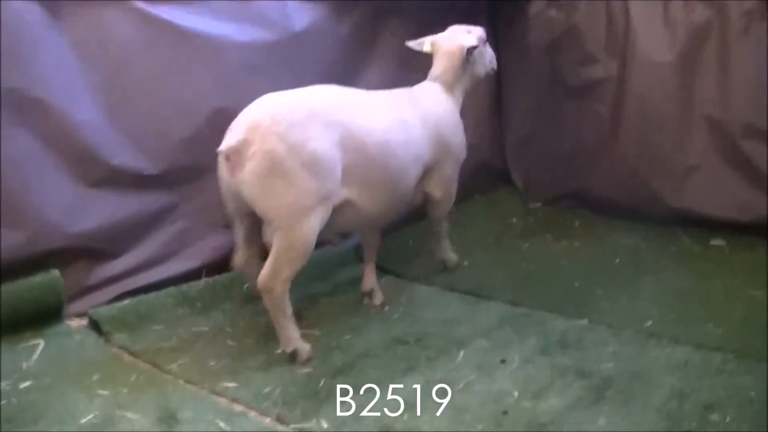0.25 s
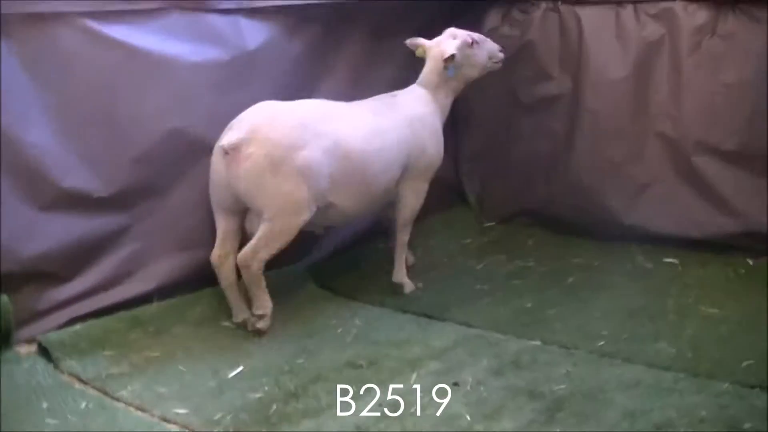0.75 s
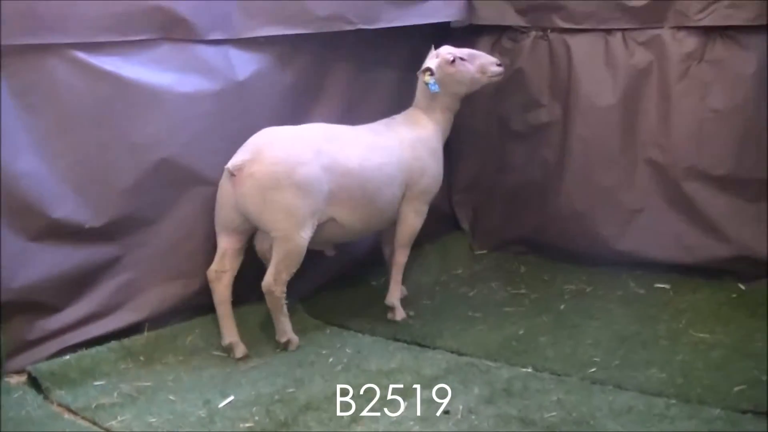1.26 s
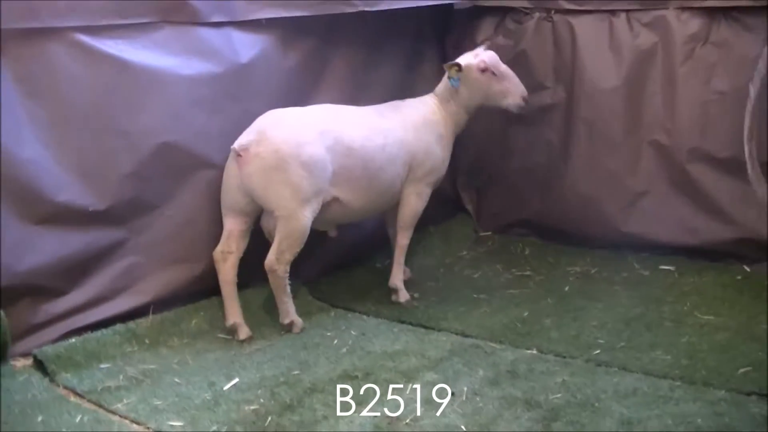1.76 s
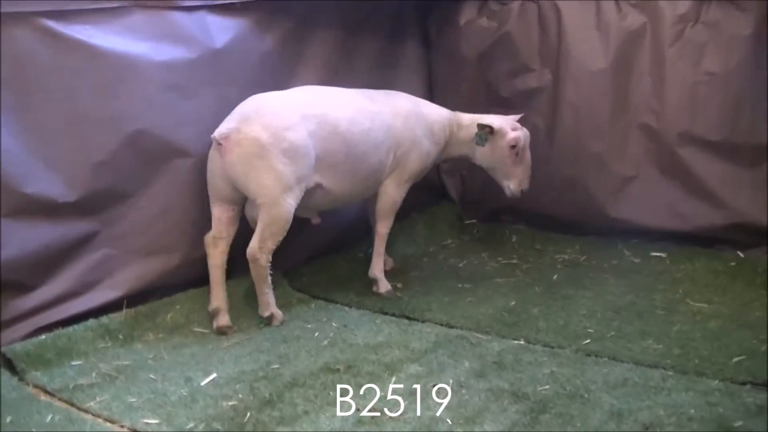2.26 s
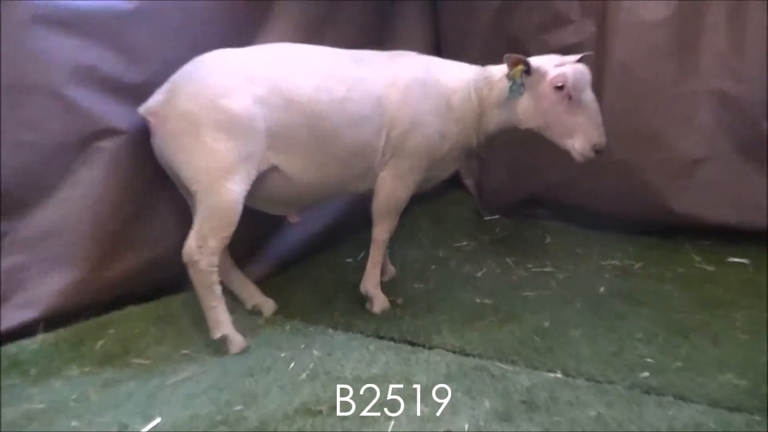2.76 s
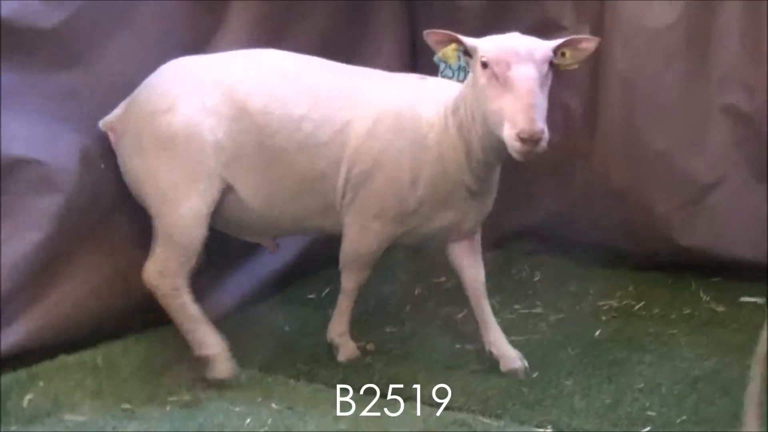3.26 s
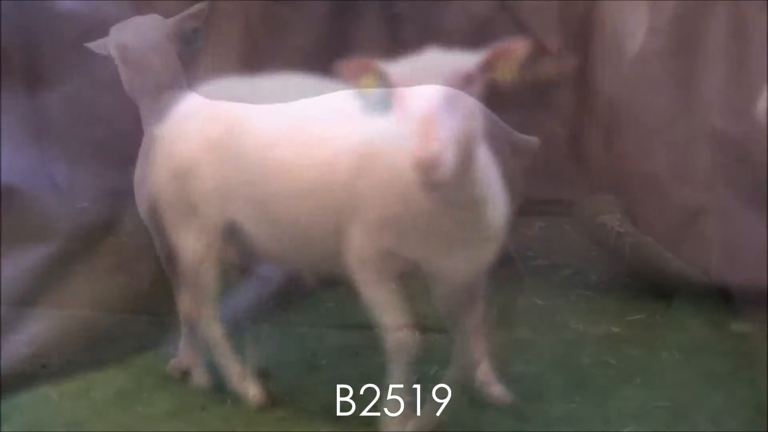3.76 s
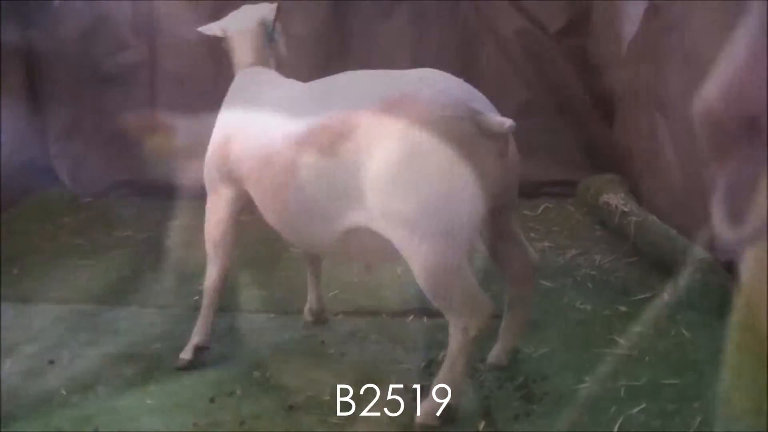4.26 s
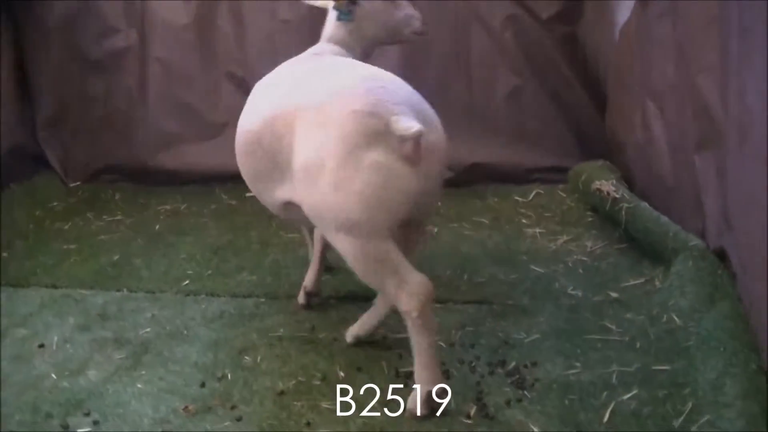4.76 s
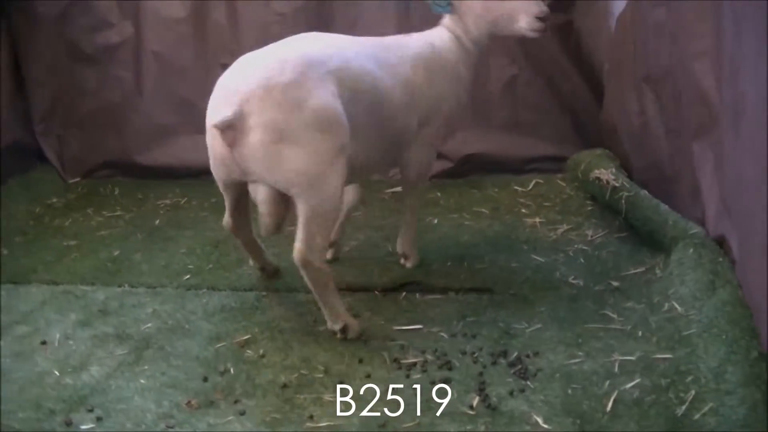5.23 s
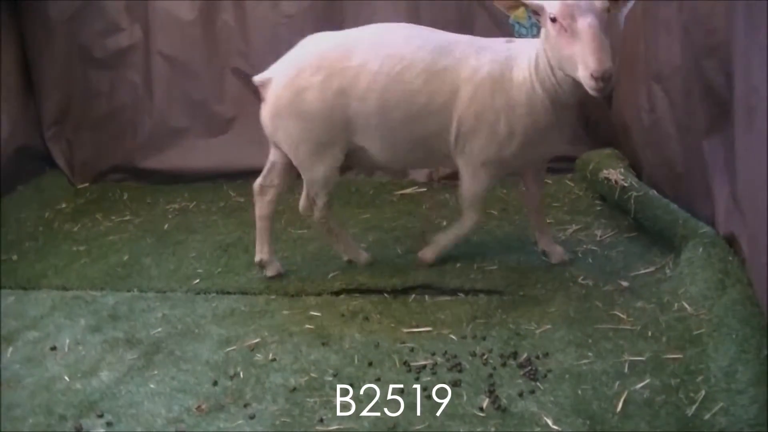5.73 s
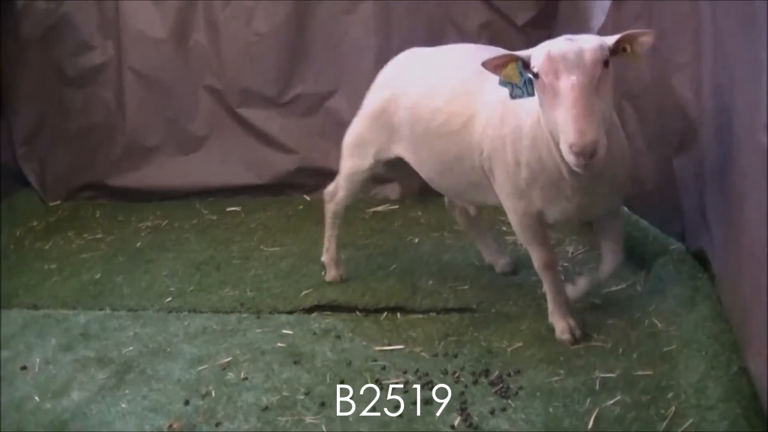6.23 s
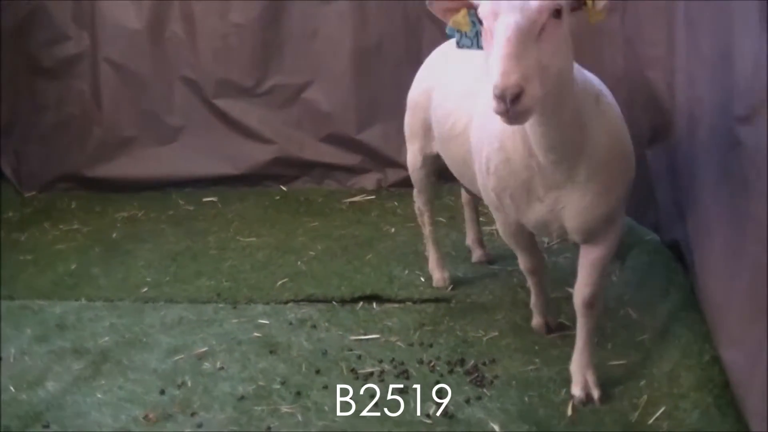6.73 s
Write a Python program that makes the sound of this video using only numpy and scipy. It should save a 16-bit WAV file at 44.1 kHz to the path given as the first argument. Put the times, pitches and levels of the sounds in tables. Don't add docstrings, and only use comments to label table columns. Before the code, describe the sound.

A ram hums low then opens into a rough bleat, a higher lamb answers hoarsely, and small birds chirp and whistle throughout an echoing shed.

```python
import sys
import numpy as np
from scipy import signal
from scipy.io import wavfile
from scipy.ndimage import uniform_filter1d

SR = 44100
rng = np.random.default_rng(int(sys.argv[2]) if len(sys.argv) > 2 else 0)


def boost(x):
    u = np.asarray(x, float) / 20
    return 10 ** u


def transcribe(u):
    v = np.clip(np.atleast_2d(u).T, -1, 1)
    q = np.round(v * 32767).astype(np.int16)
    wavfile.write(sys.argv[1], SR, q)


N = 308241
CLEAR = .008

# frequency in Hz, level in dB.
HISS_COLOUR = [(150, -43), (250, -2.5), (386, 3), (685, -5.5), (1740, -8.5), (5570, -4), (7030, -6),
               (10200, -3)]
# frequency in Hz, correlation from -1 to 1.
LIKENESS = [(60, 0.33), (300, 0), (1100, 0.22), (2400, 0.77), (5000, 1), (10000, 0.99)]
# frequency in Hz, level in dB per Hz.
AIR_COLOUR = [(15, -17), (22, -0.5), (50, -4), (290, -24.5), (447, -54.5), (600, -75.5)]
# peak time in seconds, rise over the calm in dB.
GUSTS = [(.1, 3), (.45, 6), (.8, 7), (1.6, -3), (2.942, 3.5), (4.56, 11), (4.8, 4), (5.12, 14),
         (5.47, 14.5), (5.85, 6.5), (6.22, 8), (6.64, 7.5)]
OFFSET = [
    [.0068],
    [.0116],
]

# start in seconds, level in dB.
ARCH_SYLLABLE = ([(0, 6100, -34.5), (.01, 8000, -45.5), (.04, 8250, -46.5), (.078, 7900, -44),
                  (.107, 7100, -41)], [(.355, -6), (.597, -7.5), (.848, -4.5)])
DROP_SYLLABLE = ([(0, 5700, -42), (.013, 4250, -49), (.033, 3850, -53)], [(.487, -0.67), (.738, -1.4),
                  (.988, -1.6)])
FALL_SYLLABLE = ([(0, 6610, -39), (.015, 7400, -57.5), (.067, 6560, -45), (.115, 4410, -50)],
                  [(3.245, -0.61), (3.4, -0.74), (3.558, 1), (3.72, 0.27), (3.89, -0.38)])
LOW_ARCH_SYLLABLE = ([(0, 1674, -47.5), (.022, 1908, -40), (.036, 1813, -47), (.055, 1396, -54)],
                      [(.035, 0), (.49, 0)])

# share of the length, share of the way from first to second pitch, level in dB.
HELD = [(0, 0.018, 0.5), (1, 1, 0.5)]
DYING = [(0, 0.037, 1), (1, 0.94, -19.5)]
SWELLING = [(0, 0.054, -8), (1, 1, -3.5)]
ARCHED = [(0, 0, 0), (.45, 0.97, -3.5), (1, -.1, -2)]
HOOKED = [(0, -.1, -14), (.17, 0.99, 0.5), (.5, .7, 1), (.75, .1, -5.5), (1, 0, -10.5)]
SWOOPING = [(0, 0, -6), (.3, .65, -4), (1, 1, -3)]
SCOOPED = [(0, .5, -4), (.12, 0.011, -3), (.28, 0.069, -1.5), (.75, .85, -4), (1, 1, -4.5)]

# start in seconds, length in seconds, first pitch in Hz, second pitch in Hz, level in dB.
LEFT_HELD = [(0.276, 0.27, 1483, 1471, -66), (3.875, 0.061, 3980, 3850, -53),
             (4.036, 0.014, 4290, 2990, -48), (4.038, 0.038, 4110, 4070, -50),
             (4.358, 0.033, 5310, 5330, -41), (5.786, 0.025, 3650, 4030, -36.5),
             (5.896, 0.028, 3220, 3936, -33.5), (4.674, 0.017, 3010, 3075, -38.5),
             (4.748, 0.024, 2970, 3050, -48), (4.821, 0.013, 3720, 3280, -44),
             (4.837, 0.18, 3090, 3213, -48.5), (5.743, 0.041, 2410, 2635, -49),
             (5.976, 0.046, 3635, 2806, -44.5), (6.145, 0.019, 3920, 3450, -43.5),
             (6.188, 0.031, 3924, 3684, -46), (5.191, 0.21, 4870, 4870, -56),
             (5.422, 0.041, 2426, 2270, -57.5), (6.936, 0.057, 6180, 6220, -53)]
LEFT_DYING = [(4.102, 0.019, 3830, 3840, -36), (4.179, 0.0078, 3340, 3860, -32),
              (4.26, 0.029, 5200, 5280, -39.5), (4.279, 0.023, 3886, 4030, -29),
              (4.717, .02, 2630, 2920, -38), (4.769, 0.015, 3040, 3075, -39.5),
              (5.28, 0.032, 6890, 6910, -34), (4.69, 0.025, 2880, 2320, -41),
              (4.76, 0.014, 3300, 3690, -34), (5.555, 0.016, 5540, 2980, -41),
              (6.328, 0.01, 4870, 4350, -43.5), (5.835, 0.027, 3000, 2990, -40.5)]
LEFT_SWELLING = [(3.4, 0.077, 5540, 5170, -50), (4.167, 0.055, 4600, 4450, -38.5),
                 (4.359, 0.036, 4120, 4400, -40.5), (5.42, .035, 6540, 5850, -34.5),
                 (5.82, 0.016, 4110, 2950, -35.5)]
LEFT_ARCHED = [(5.737, 0.038, 3785, 4720, -30), (6.054, 0.043, 3403, 4360, -31.5)]
LEFT_HOOKED = [(2.408, .09, 4400, 6900, -42), (5.545, .135, 3950, 6970, -35.5)]
LEFT_SWOOPING = [(4.56, 0.04, 7600, 4700, -37), (4.595, .03, 4900, 3600, -38),
                 (4.635, .05, 5300, 2950, -34.5), (5.918, 0.0586, 3300, 2800, -38.5),
                 (5.768, 0.0223, 3900, 3700, -28)]
LEFT_SCOOPED = [(6.882, .1, 2198, 3184, -36.5)]
AHEAD_HELD = [(.164, 0.052, 1867, 3515, -46.5), (.208, 0.02, 3234, 3320, -40),
              (0.215, 0.1, 5880, 5970, -51), (4.229, 0.013, 3900, 4500, -36.5),
              (0.701, 0.028, 3100, 3130, -50), (.998, .03, 2046, 2070, -61), (1.11, 0.11, 6180, 6280, -46),
              (1.461, 0.16, 7400, 7260, -46.5), (4.41, 0.024, 5990, 6080, -43.5),
              (1.725, 0.064, 5200, 4825, -46), (1.79, 0.038, 4830, 3290, -50.5),
              (1.985, 0.023, 4980, 3700, -52), (5.575, 0.019, 2300, 2460, -58),
              (5.68, .04, 3960, 4060, -53), (1.916, 0.065, 5120, 4830, -44),
              (2.109, 0.065, 5000, 4937, -42.5), (2.266, 0.097, 7880, 7640, -45),
              (4.066, 0.14, 7840, 7480, -51), (4.101, 0.066, 5500, 5000, -55),
              (4.92, 0.028, 2486, 3594, -48.5), (5.113, 0.053, 2310, 2735, -52),
              (5.174, .12, 3190, 2860, -53.5), (5.196, 0.035, 7650, 7400, -36.5),
              (5.301, 0.078, 2553, 2280, -57), (5.94, 0.083, 2370, 2354, -55.5),
              (6.07, 0.033, 2296, 2260, -54.5)]
AHEAD_DYING = [(1.2, 0.05, 6380, 5380, -42.5), (4.24, 0.062, 4430, 4320, -30),
               (5.383, 0.079, 2738, 2820, -48), (5.717, 0.014, 5010, 3150, -40)]
AHEAD_SWELLING = [(4.428, 0.026, 6090, 4750, -36.5), (4.83, 0.029, 6600, 7300, -46.5),
                  (4.853, .018, 7150, 4160, -39.5), (5.16, 0.032, 8660, 7770, -34.5),
                  (5.322, 0.022, 5060, 7550, -37), (5.845, 0.07, 3760, 3820, -45)]
AHEAD_ARCHED = [(3.1, 0.085, 6770, 7680, -47), (5.458, 0.0337, 6070, 5590, -42)]
AHEAD_SWOOPING = [(5.36, .05, 6800, 5870, -31.5)]
RIGHT_HELD = [(.085, 0.016, 3250, 2710, -51.5), (.617, 0.061, 2157, 3555, -44),
              (1.031, 0.065, 2930, 2620, -52.5), (1.246, 0.036, 5370, 5370, -47),
              (1.245, 0.041, 4600, 4440, -49.5), (1.279, 0.0088, 4330, 3900, -47),
              (1.401, 0.03, 3274, 2594, -46.5), (1.442, 0.025, 2890, 2600, -50),
              (1.02, 0.021, 1970, 2830, -64), (5.1, 0.015, 4300, 5800, -53.5),
              (5.115, 0.02, 5830, 6000, -46), (6.69, 0.2, 3500, 3527, -48)]
RIGHT_DYING = [(0.033, 0.013, 3270, 2900, -43.5), (1.723, 0.044, 3185, 3330, -39)]
RIGHT_SWELLING = [(5.132, .035, 5930, 4480, -36.5)]
RIGHT_ARCHED = [(6.235, .07, 2490, 2855, -52)]
RIGHT_SWOOPING = [(1.516, .107, 3350, 2760, -46)]
RIGHT_SCOOPED = [(6.565, .125, 2462, 3516, -41.5)]
HARSH = [(5.24, .05, 8600, 8200, -48.5), (5.4, .06, 7000, 6700, -47), (4.03, .06, 3500, 3100, -54),
         (4.5, .05, 3500, 2700, -55.5), (.25, .1, 3500, 3480, -57), (5.135, .025, 6000, 8500, -45.5),
         (5.23, .05, 8000, 7600, -44), (5.335, 0.035, 6800, 6600, -41.5), (5.35, 0.12, 7700, 7300, -49.5),
         (1.32, .025, 4900, 3900, -45), (4.3, 0.0965, 4200, 4100, -52.5), (4.45, .07, 5000, 4800, -53.5),
         (.23, 0.065, 3100, 3100, -53), (.68, .05, 2700, 2900, -59)]

# time in seconds, pitch in Hz, level in dB.
EWE = [
    [(4.79, 275, -60), (4.846, 281.5, -58), (4.934, 289.3, -56.5), (5.14, 261.5, -57)],
    [(5.6, 280.3, -60), (5.712, 291.4, -56.5), (5.82, 281.3, -60), (5.94, 242.4, -69)],
]
# frequency in Hz, width in Hz, level in dB.
EWE_THROAT = [(1205, 100, -3.5), (1450, 280, -6), (1783, 260, -8)]

# time in seconds, pitch in Hz, level in dB, hoarseness from 0 to 1.
LAMB = [
    (2.54, 335.8, -45.5, .8),
    (2.6, 368.4, -36.5, .8),
    (2.685, 389, -34.5, .9),
    (2.73, 420.6, -37.5, 0),
    (2.82, 426, -32.5, .05),
    (2.92, 417.2, -33, 0),
    (2.96, 404, -35, 0.8),
    (3.08, 394.8, -35, 0.3),
    (3.27, 354.8, -33, 0.74),
]
# frequency in Hz, width in Hz, level in dB.
LAMB_THROAT = [(407, 200, -16), (834, 134, 2), (1212, 300, 6.5), (2620, 413, -1), (4255, 750, -4),
               (5200, 2200, -10.5), (6540, 3000, -23.5), (10020, 620, -8.5)]
# time in seconds, length in seconds, dip in dB.
CATCHES = [(2.65, 0.018, 5), (2.715, 0.026, 2), (2.9, .012, 2.5), (2.932, 0.013, 4.5), (2.965, 0.013, 1),
           (3.0, 0.013, 2), (3.115, 0.03, 8), (3.172, 0.025, 9.5), (3.222, 0.017, 2.5), (3.274, 0.023, 15),
           (2.59, .014, 4)]

# time in seconds, pitch in Hz, level in dB, mouth opening from 0 to 1.
RAM = [
    (1.1, 86.5, -59, 0.13),
    (1.3, 97.5, -47.5, 0.05),
    (1.585, 105.4, -44, 0.04),
    (1.632, 99.6, -41, 0.19),
    (1.89, 120, -37, 0.31),
    (1.985, 123, -37.5, 0.32),
    (2.015, 124.6, -29.5, 0.93),
    (2.385, 129.5, -28.5, 0.93),
    (2.46, 112, -47.5, 0.81),
]
# closed frequency in Hz, open frequency in Hz, width in Hz, closed level in dB, open level in dB.
RAM_THROAT = [(441, 376, 79, 6, 1), (195, 700, 450, 1, -13), (890, 1180, 190, -2, -4.5),
              (1536, 1570, 103, -17, -8), (2118, 1900, 200, -12.5, -16), (1780, 2044, 200, -57, -6.5),
              (2750, 3060, 640, -30.5, -9), (4600, 4800, 950, -45, -28.5)]
# mouth opening from 0 to 1, level in dB.
TWANG = [(0, -2.5), (.25, 17), (.45, 11), (1, -16)]


def rms_one(x):
    return x / np.sqrt(np.mean(x ** 2) + 1e-20)


def sampled(rows):
    s, *columns = np.transpose(rows)
    at = np.arange(round(s[0] * SR), min(round(s[-1] * SR), N))
    return at, [np.interp(at / SR, s, c) for c in columns]


def at_hz(points, hz):
    points = np.array(points)
    return np.interp(np.log(hz), np.log(points[:, 0]), points[:, 1])


def drift(rate_hz, size=N):
    r = np.exp(-2 * np.pi * rate_hz / SR)
    settle = 9000
    noise = rng.standard_normal(size + settle)
    return rms_one(signal.lfilter([1], [1, -2 * r, r * r], noise)[settle:])


def fades(size, rise_s, fall_s):
    t = np.arange(size) / SR
    return np.clip(np.minimum(t / rise_s, t[::-1] / fall_s), 0, 1)


def placed(x, pan_db, lag):
    left = np.interp(np.arange(N) - lag, np.arange(N), x)
    return np.array([left * boost(pan_db / 2), x * boost(-pan_db / 2)])


def shed(x, t60_s):
    t = np.arange(SR // 2) / SR
    near, roof = rng.standard_normal((2, 2, len(t)))
    roof = signal.sosfilt(signal.butter(1, 7000, fs=SR, output="sos"), roof)
    tail = roof * boost(-60 * t / t60_s) + near * boost(5.5 - 60 * t / 0.17)
    tail = tail * np.clip(t / 0.0029, 0, 1)
    return signal.fftconvolve(x, tail / np.sqrt(np.sum(tail ** 2) / 2), axes=1)[:, :N]


def banded_noise(spectrum, low_hz, count, patchy_db):
    out, together = 0, drift(3)
    edges = low_hz * 2 ** (np.arange(count) / 2)
    white = rng.standard_normal((2, 2, N))
    for k, (low, high) in enumerate(zip(edges, edges[1:])):
        band = signal.butter(2, [low, high], "band", fs=SR, output="sos")
        mid, side = signal.sosfilt(band, white[k % 2])
        hz = low * 2 ** .2
        alike = np.clip(at_hz(LIKENESS, hz), -1, 1)
        gain = boost(at_hz(spectrum, hz) + patchy_db * (0.46 * together + drift(24)))
        out = out + gain * (np.sqrt(1 + alike) * mid + np.sqrt(1 - alike) * side * [[1], [-1]])
    return rms_one(out)


def hiss():
    level_db, falls_db_per_s = -52, 0.79
    noise = banded_noise(HISS_COLOUR, low_hz=195, count=13, patchy_db=.4)
    return boost(level_db - falls_db_per_s * np.arange(N) / SR) * noise


def air():
    calm_db, rise_s, fall_s = -53.5, 0.2, 0.23
    t = np.arange(N) / SR
    puffs = [db * np.interp(t, [s - rise_s, s, s + fall_s], [0, 1, 0]) for s, db in GUSTS]
    return boost(calm_db + sum(puffs)) * banded_noise(AIR_COLOUR, low_hz=13.8, count=12, patchy_db=3.5)


def whistles(notes, waver_hz=35, flutter_db=1.5):
    out, waver, flutter = np.zeros(N), drift(343), drift(140)
    for rows in notes:
        at, (pitch, level_db) = sampled(rows)
        pitch = uniform_filter1d(pitch, size=330, mode="nearest") + waver_hz * waver[at]
        tone = np.sqrt(2) * np.sin(2 * np.pi * np.cumsum(pitch) / SR)
        out[at] += boost(level_db + flutter_db * flutter[at]) * fades(len(at), .003, .003) * tone
    return out


def sung(kind, notes):
    when, way, db = np.transpose(kind)
    return [np.transpose([s + length * when, first + (second - first) * way, level + db])
            for s, length, first, second, level in notes]


def repeated(shape, singings):
    return [np.array(shape) + [s, 0, db] for s, db in singings]


def flock(count):
    when, pitch, size = rng.random((count, 3)).T
    s = np.interp(when, [0, 1], (4.0, 6.65))
    hz = np.interp(pitch, [0, 1], (5770, 7400))
    notes = np.transpose([s, 0.0198 + .04 * size, hz, .85 * hz, -65 + 6 * size])
    return whistles(sung(HELD, notes))


def trill():
    note, pips_hz = (.77, .16, 2650, 2150, -58), 80
    return whistles(sung(HELD, [note])) * (1 + np.cos(2 * np.pi * pips_hz * np.arange(N) / SR))


def buzz():
    start_s, end_s = 5.378, 5.47
    hz, width_hz, level_db = 3940, 790, -45.5
    t = np.arange(N) / SR
    pulses = np.cos(np.pi * 95 * t) ** 4
    gate = pulses * np.clip(np.minimum(t - start_s, end_s - t) / 0.012, 0, 1)
    sos = signal.butter(2, [hz - width_hz / 2, hz + width_hz / 2], "band", fs=SR, output="sos")
    return boost(level_db) * gate * rms_one(signal.sosfilt(sos, rng.standard_normal(N)))


def birds():
    left = sung(HELD, LEFT_HELD) + sung(DYING, LEFT_DYING) + sung(SWELLING, LEFT_SWELLING)
    left += sung(ARCHED, LEFT_ARCHED) + sung(HOOKED, LEFT_HOOKED)
    left += sung(SWOOPING, LEFT_SWOOPING) + sung(SCOOPED, LEFT_SCOOPED)
    ahead = sung(HELD, AHEAD_HELD) + sung(DYING, AHEAD_DYING) + sung(SWELLING, AHEAD_SWELLING)
    ahead += sung(ARCHED, AHEAD_ARCHED) + sung(SWOOPING, AHEAD_SWOOPING)
    ahead += repeated(*ARCH_SYLLABLE) + repeated(*DROP_SYLLABLE) + repeated(*FALL_SYLLABLE)
    right = sung(HELD, RIGHT_HELD) + sung(DYING, RIGHT_DYING) + sung(SWELLING, RIGHT_SWELLING)
    right += sung(ARCHED, RIGHT_ARCHED) + sung(SWOOPING, RIGHT_SWOOPING) + sung(SCOOPED, RIGHT_SCOOPED)
    right += repeated(*LOW_ARCH_SYLLABLE)
    harsh = whistles(sung(HELD, HARSH), waver_hz=230, flutter_db=3.5)
    from_left = placed(whistles(left), pan_db=1.5, lag=2.82)
    from_ahead = placed(whistles(ahead) + harsh + trill() + buzz(), pan_db=-1, lag=0.6)
    from_right = placed(whistles(right), pan_db=-3.5, lag=0.85)
    return from_left + from_ahead + from_right


def voice(at, pitch, level_db, rough, throat, count, jitter, steep):
    turns = np.cumsum(pitch * (1 + jitter * (1 + 20 * rough) * drift(40, size=len(at)))) / SR
    sound, power = 0, 1e-20
    slow, slow_pitch = at[::50], pitch[::50]
    throat = [(np.broadcast_to(hz, pitch.shape)[::50], width, db) for hz, width, db in throat]
    for k in range(1, count + 1):
        detune = [(db, 2 * (k * slow_pitch - hz) / width) for hz, width, db in throat]
        paths = np.array([boost(db) / (1 + 1j * x) ** steep for db, x in detune])
        gain = np.sqrt(np.sum(abs(paths) ** 2, axis=0)) * np.exp(1j * np.angle(paths.sum(axis=0)))
        gain = np.interp(at, slow, gain.real) + 1j * np.interp(at, slow, gain.imag)
        noise_share = rough ** (1 / (1 + k * pitch[0] / 3000))
        fold_noise = drift(.4 * pitch.mean(), size=len(at))
        shimmer = np.sqrt(1 - noise_share) + np.sqrt(noise_share) * fold_noise
        shimmer *= boost(min(.5 * k, 2.5) * drift(13, size=len(at)))
        wave = np.exp(2j * np.pi * (k * turns + 0.43 * rng.random()))
        sound = sound + shimmer * np.real(gain * wave)
        power = power + abs(gain) ** 2 / 2
    out = np.zeros(N)
    out[at] = boost(level_db) * fades(len(at), 0.011, 0.0024) * sound / np.sqrt(power)
    return out


def roughness(pitch, share):
    slide = uniform_filter1d(np.gradient(np.log(pitch)) * SR, size=1000)
    return np.clip(CLEAR + share * .16 * slide ** 2, 0, .35)


def ewe():
    calls = [sampled(rows) for rows in EWE]
    return sum(voice(at, hz, db, 0.218, EWE_THROAT, count=8, jitter=0.00338, steep=2.7)
               for at, (hz, db) in calls)


def lamb():
    quaver_share, quaver_db = .011, 1.5
    bright_db, dulls_db_per_s = 3, 8.5
    at, (pitch, level_db, hoarse) = sampled(LAMB)
    quaver, t = drift(32, size=len(at)), at / SR
    upper_db = bright_db - dulls_db_per_s * (t - t[0])
    level_db = level_db - sum(db * np.exp(-(2 * (t - s) / length) ** 2) for s, length, db in CATCHES)
    throat = [(hz * (pitch / 415) ** (.5 * (hz < 8e3)), width, db + upper_db[::50] * (hz > 2e3))
              for hz, width, db in LAMB_THROAT]
    throat.append((1750, 1000, -6.5 - 25 * (1 - hoarse[::50])))
    pitch = pitch * (1 + quaver_share * (.5 + hoarse) * quaver)
    rough = np.clip(CLEAR / 4 + 0.036 * hoarse, 0, 1)
    return voice(at, pitch, level_db + quaver_db * quaver, rough, throat, count=27, jitter=0.0022, steep=2.26)


def ram():
    jaw_drop_s, tight_db_per_octave = (2.0, 2.17), 19
    at, (pitch, level_db, opening) = sampled(RAM)
    opening, jaw = opening[::50], np.interp(at / SR, jaw_drop_s, [0, 1])
    tight_db = tight_db_per_octave * opening ** 3 * (1 - jaw[::50])
    twang_db = np.interp(opening, *np.transpose(TWANG))
    throat = []
    for closed_hz, open_hz, width, closed_db, open_db in RAM_THROAT:
        db = closed_db + opening * (open_db - closed_db)
        db = db + twang_db * (2e3 < closed_hz < 4e3)
        ceiling_hz = 1900 if open_hz > 2100 else 2100
        octaves = np.log2(np.clip(open_hz, 1200, ceiling_hz) / 1500)
        db = db + tight_db * octaves * (open_hz > 1e3)
        throat.append((closed_hz + jaw * (open_hz - closed_hz), width, db))
    return voice(at, pitch, level_db, roughness(pitch, 0.6), throat, count=43, jitter=0.001, steep=1.43)


def scene():
    sheep = placed(ram(), pan_db=3.5, lag=-0.26) + placed(lamb(), pan_db=-10.5, lag=0.91) * boost(-1.5)
    far = placed(ewe(), pan_db=9.0, lag=-14.5)
    song = birds()
    stirred = np.arange(N) + 2.97 * drift(24.8)
    smeared = np.array([np.interp(stirred, np.arange(N), side) for side in song])
    roof_echoes = shed(boost(-1.0) * smeared + flock(count=140) + boost(-3.5) * far, t60_s=0.76)
    pen_echoes = boost(-10.0) * shed(sheep, t60_s=0.12)
    stir = air() * boost([[.6], [-.6]])
    return sheep + far + boost(1.0) * song + roof_echoes + pen_echoes + stir + hiss()


def roll_off(x):
    return signal.sosfilt(signal.butter(12, 10780, fs=SR, output="sos"), x)


def record(dry):
    end_s = 6.984
    top_cut = signal.cheby2(12, 70, 11400, fs=SR, output="sos")
    x = signal.sosfilt(top_cut, dry) + OFFSET
    return roll_off(x * (np.arange(N) < end_s * SR))


dry = scene()
out = record(dry)
transcribe(out)
```